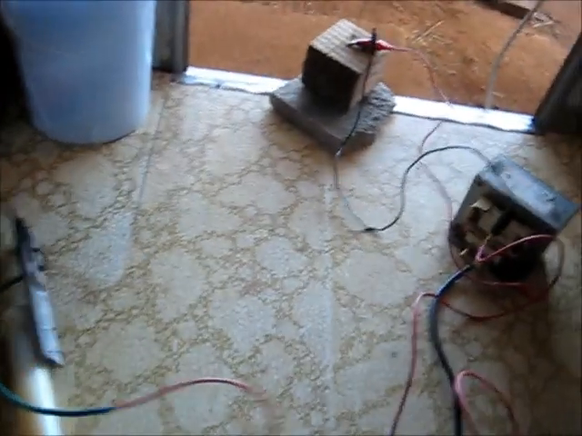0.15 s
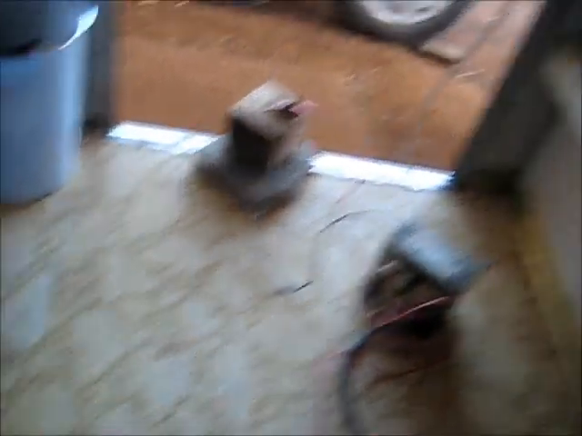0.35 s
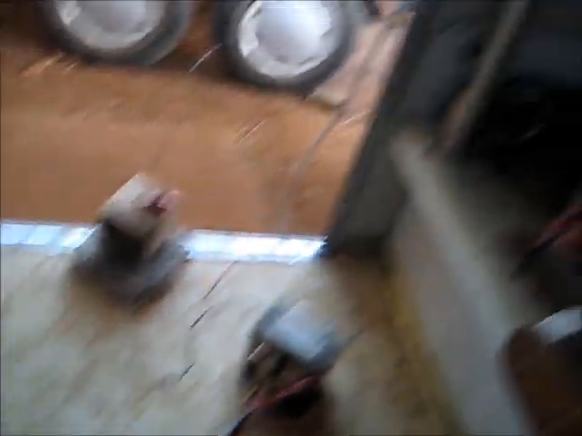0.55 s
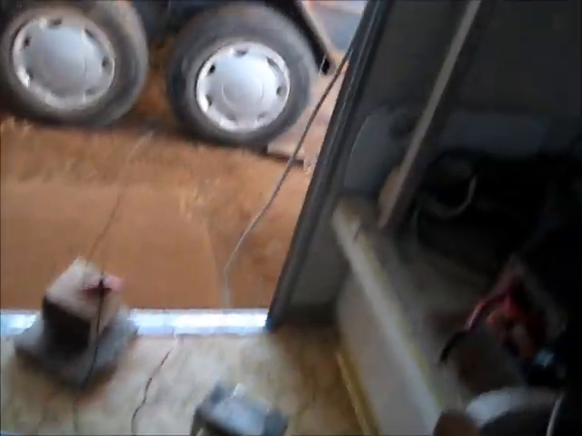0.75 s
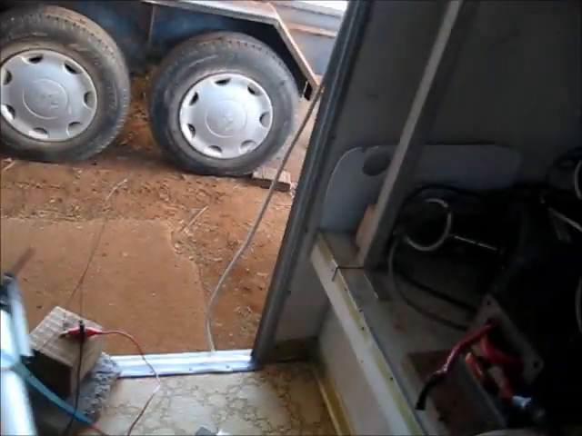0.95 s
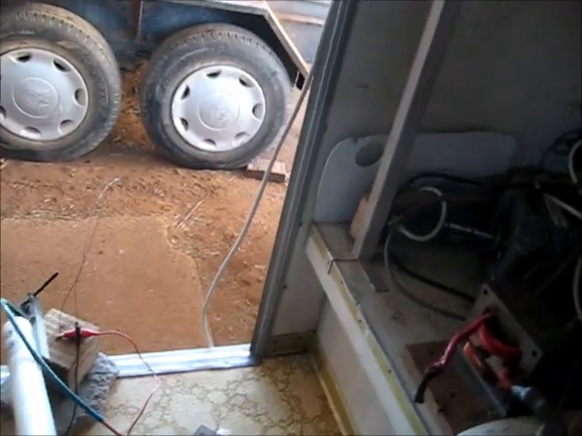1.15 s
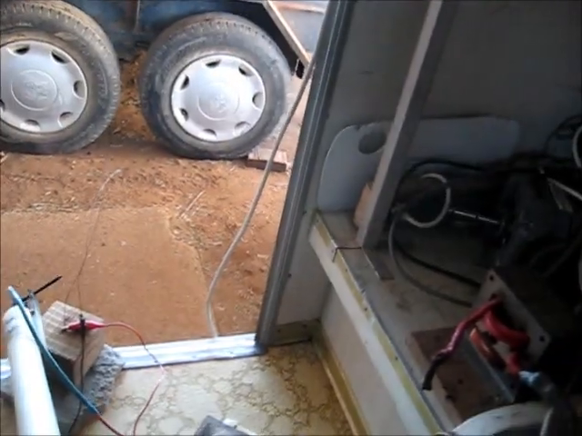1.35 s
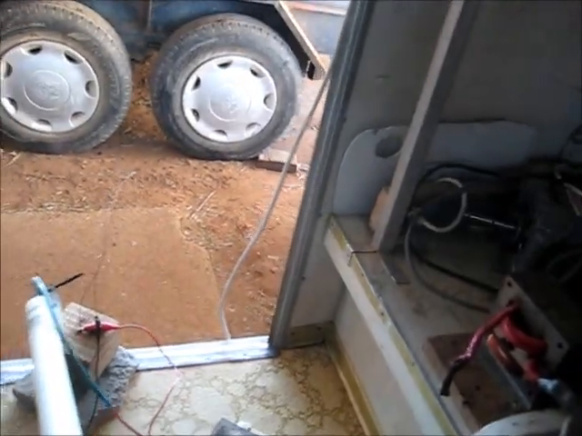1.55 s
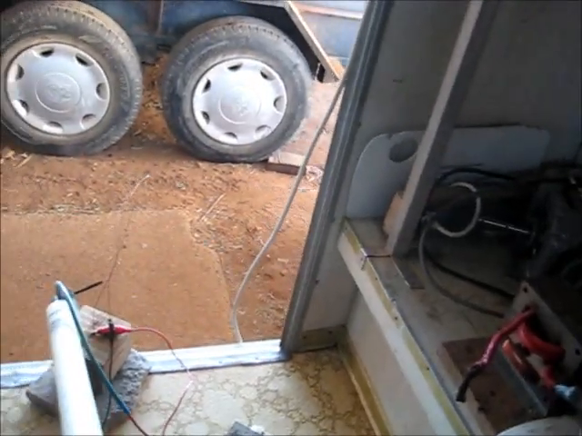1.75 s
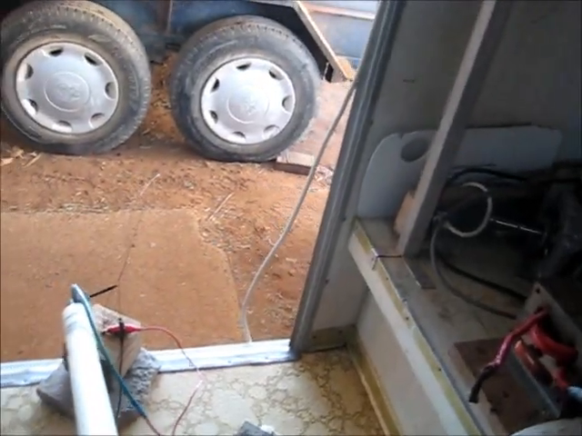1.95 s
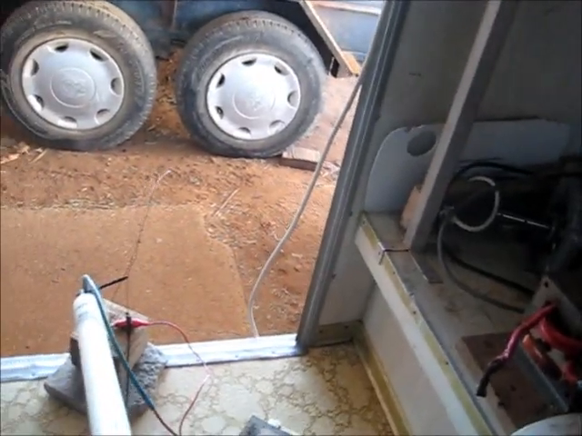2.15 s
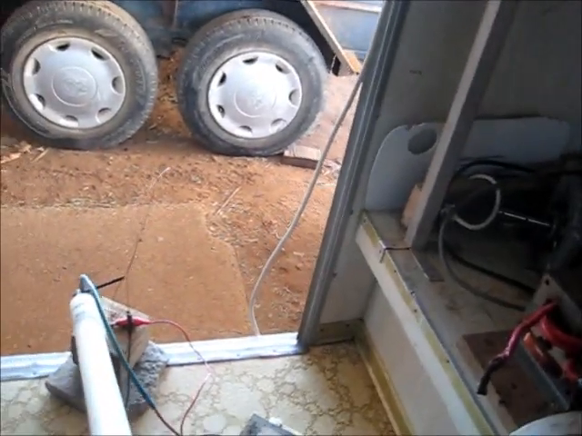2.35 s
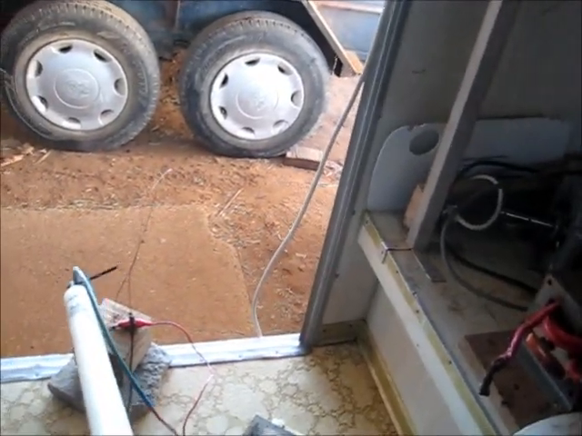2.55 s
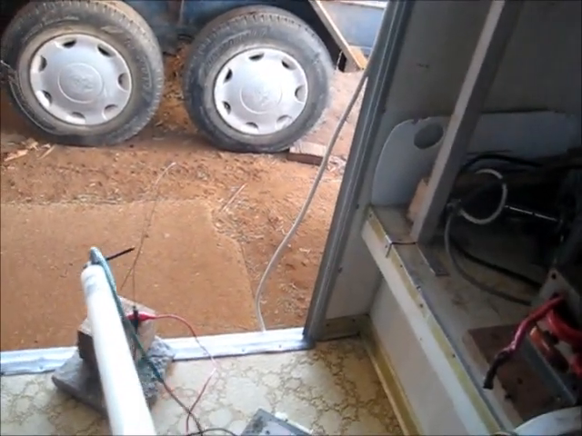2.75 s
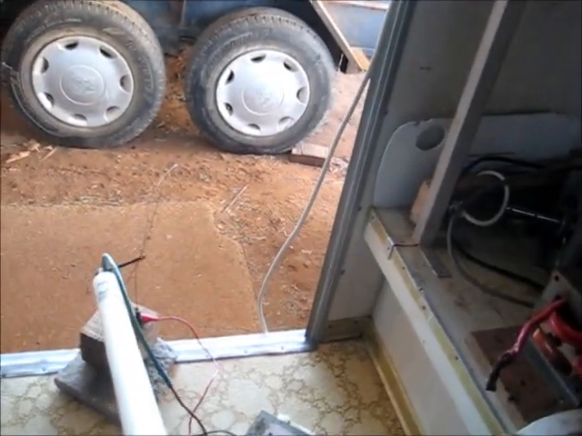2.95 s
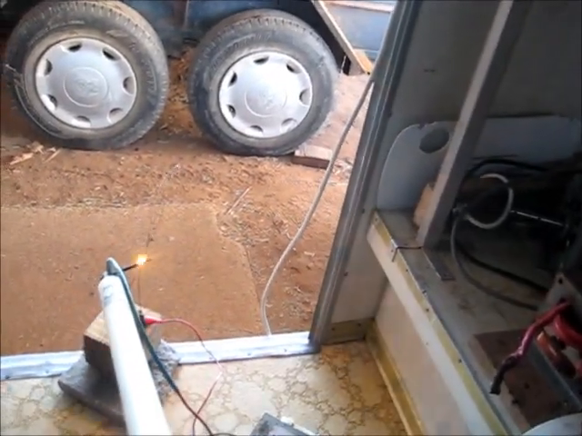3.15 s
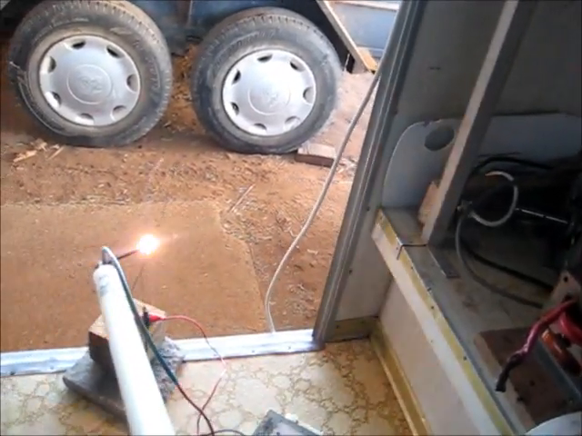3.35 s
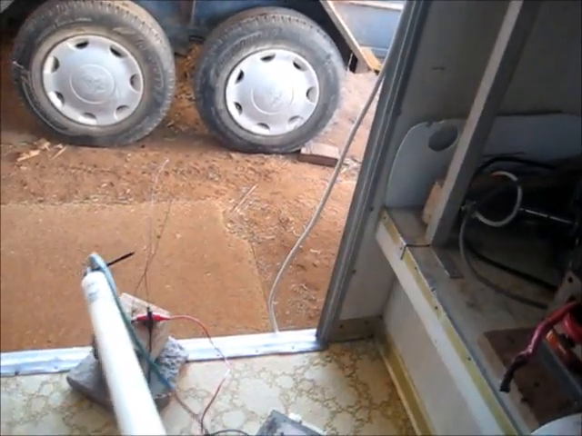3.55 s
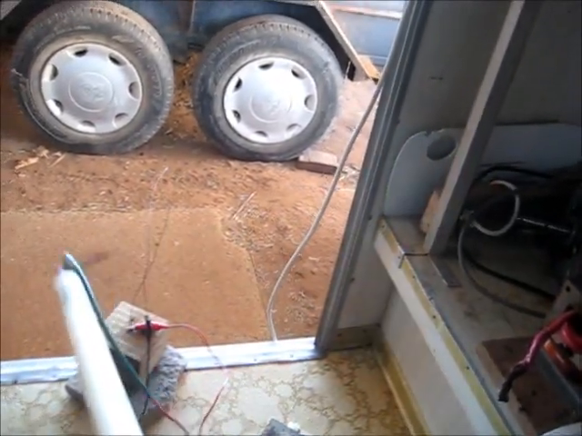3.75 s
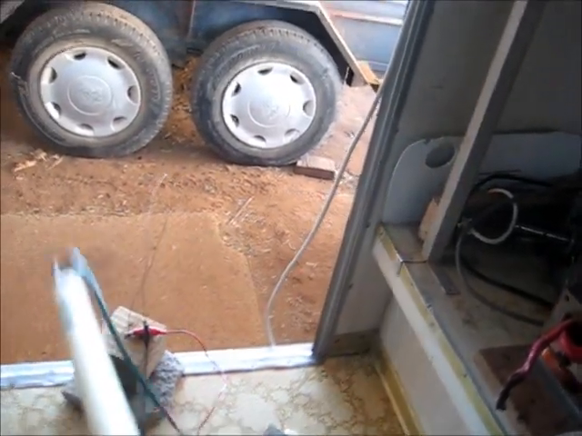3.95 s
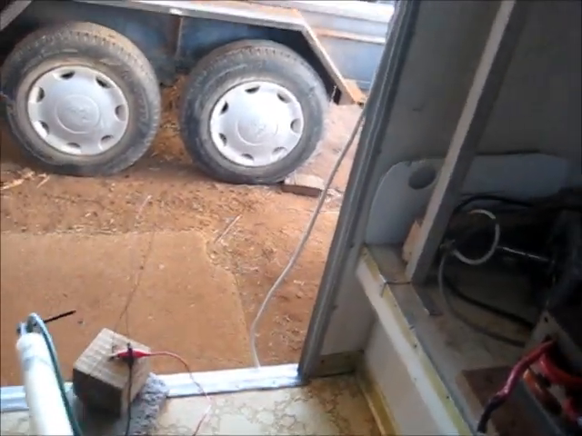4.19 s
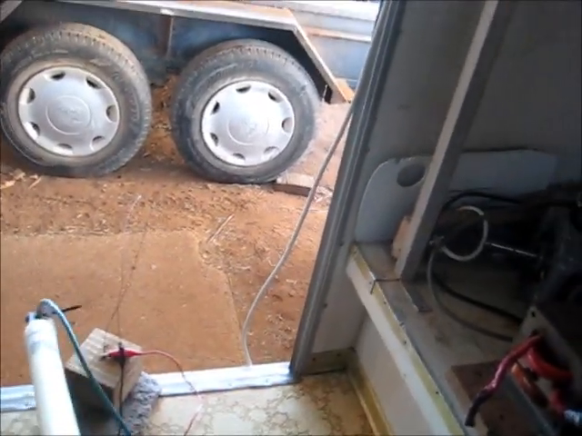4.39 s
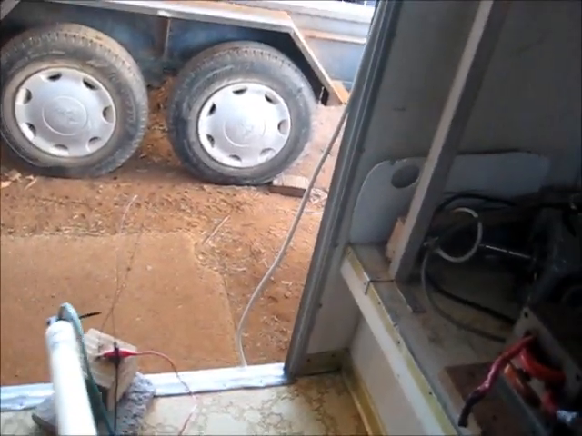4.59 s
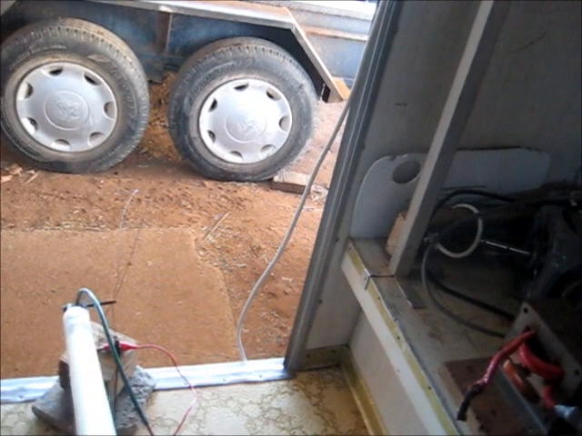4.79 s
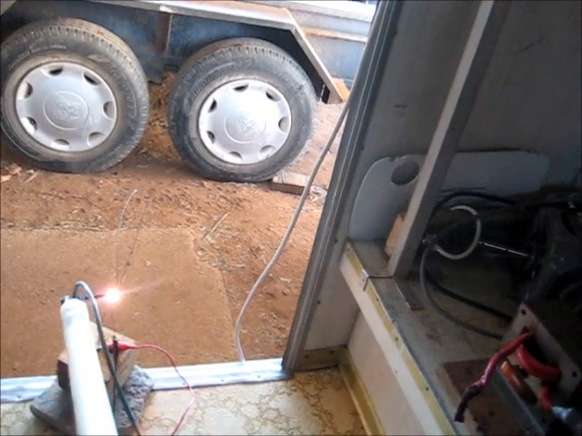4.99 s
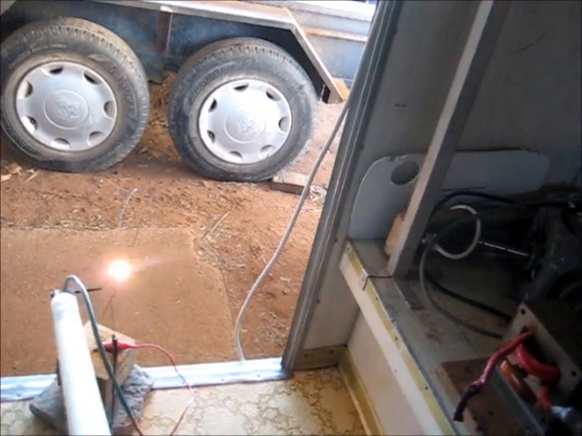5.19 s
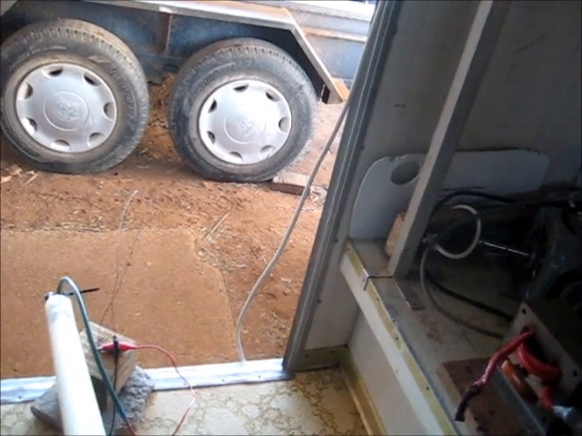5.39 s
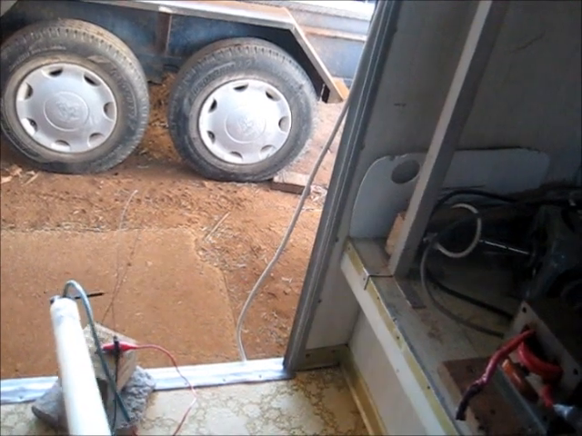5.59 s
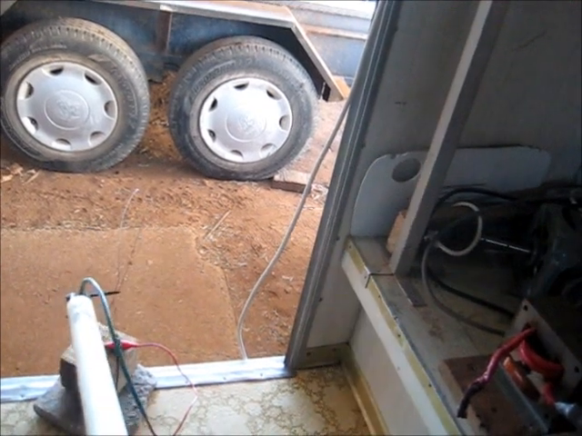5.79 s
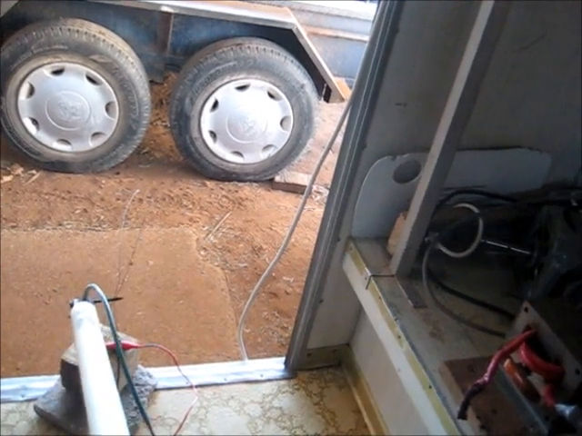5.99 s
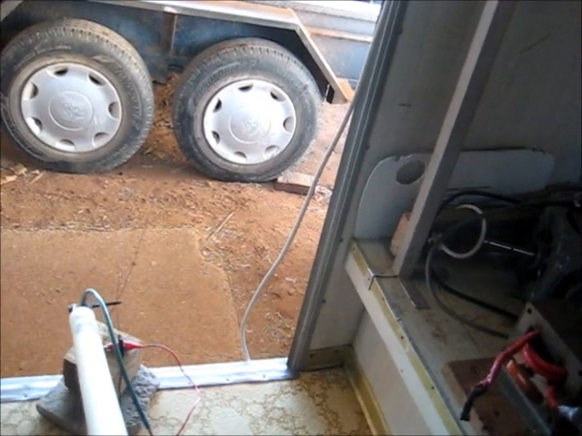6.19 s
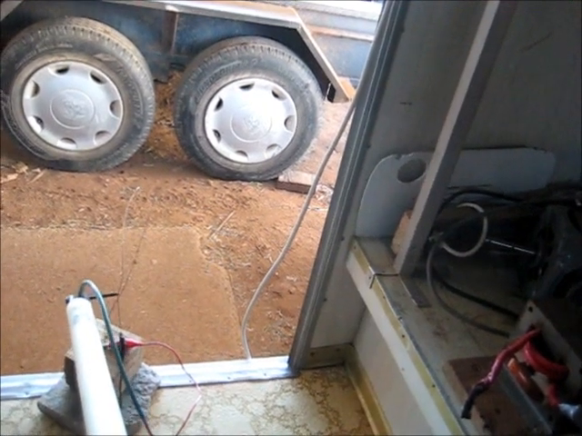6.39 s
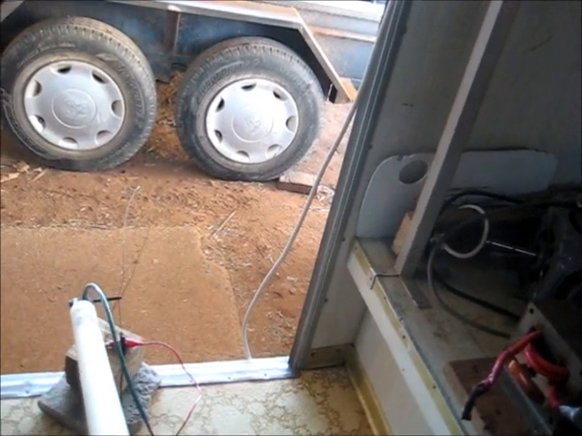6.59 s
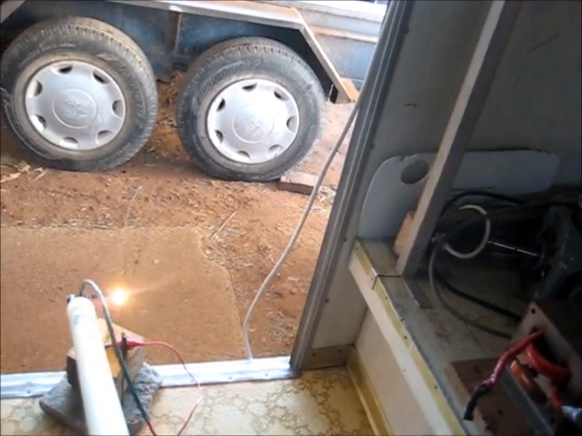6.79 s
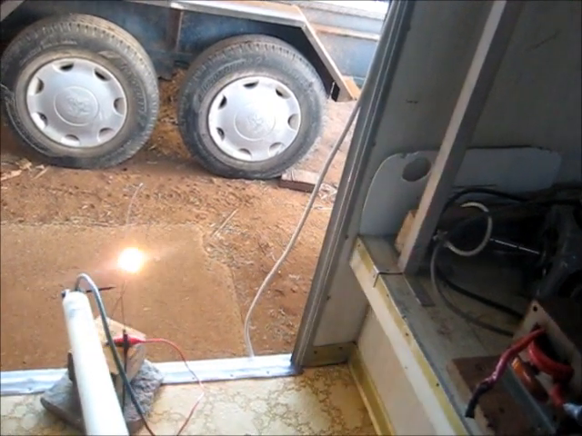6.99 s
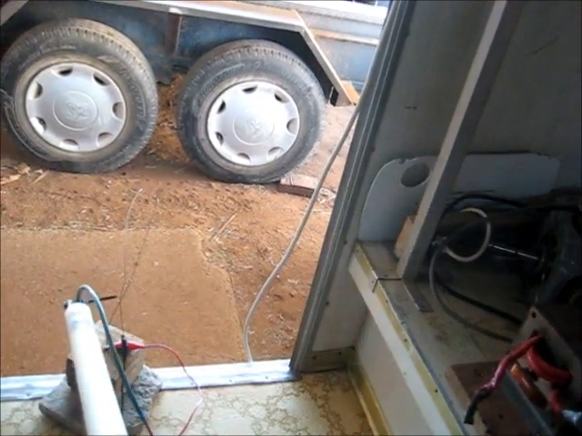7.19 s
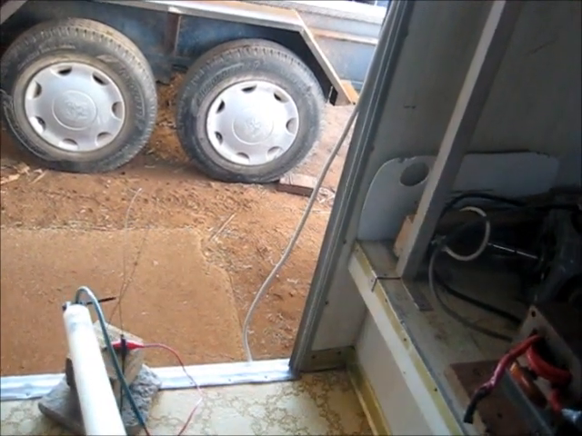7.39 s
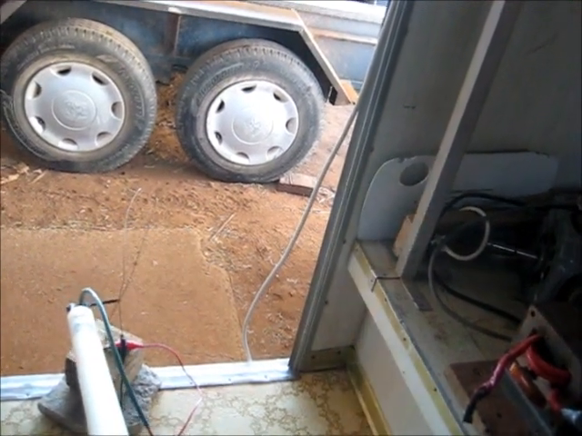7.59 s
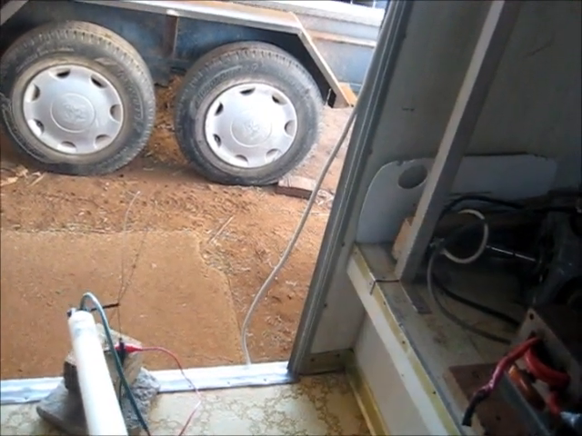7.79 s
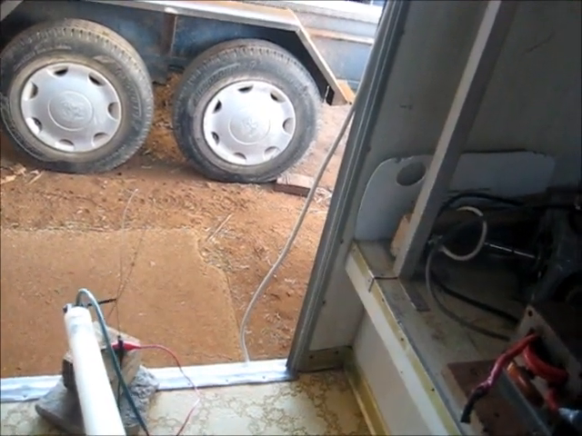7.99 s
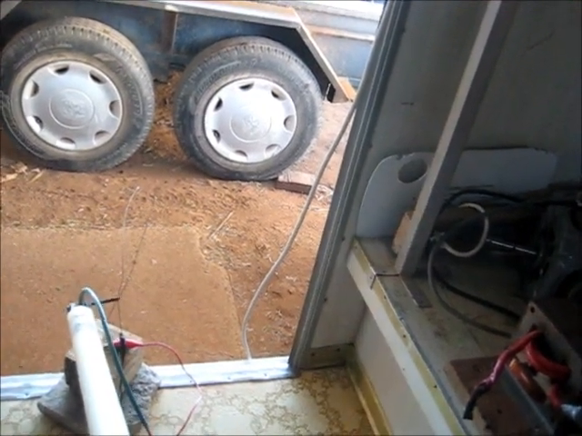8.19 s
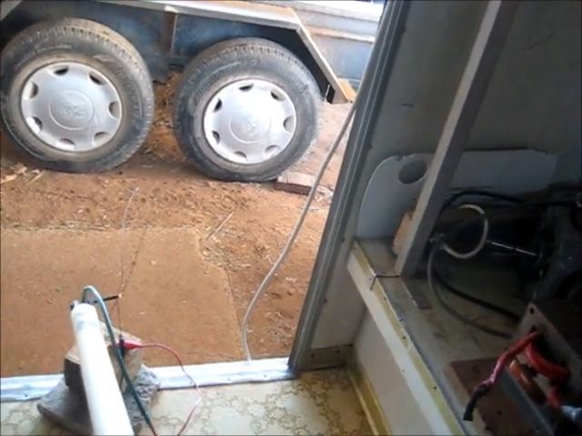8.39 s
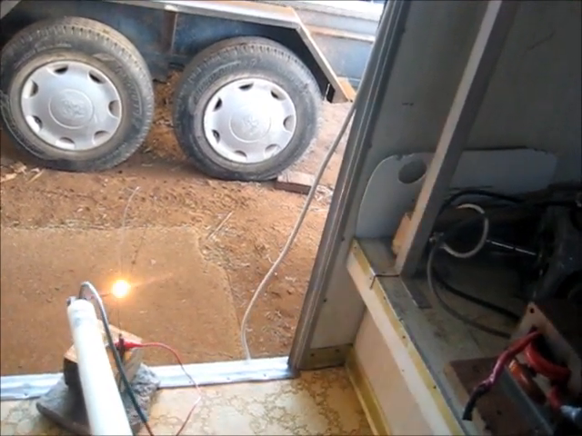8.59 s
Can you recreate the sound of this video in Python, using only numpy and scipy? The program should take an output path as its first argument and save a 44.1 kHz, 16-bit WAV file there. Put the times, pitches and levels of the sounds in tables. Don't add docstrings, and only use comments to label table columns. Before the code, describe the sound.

In a workshop doorway, cables tick and a stick knocks, then electric arcs repeatedly snap, buzz and break off above faint hum and hiss.

```python
import sys
import numpy as np
from scipy import signal
from scipy.fft import rfft, irfft, next_fast_len
from scipy.io import wavfile
from scipy.ndimage import uniform_filter1d

SR = 44100
rng = np.random.default_rng(int(sys.argv[2]) if len(sys.argv) > 2 else 0)


def wrap_up_sound(samples):
    columns = np.atleast_2d(samples).T
    tamed = np.clip(columns, -1, 1)
    steps = np.round(tamed * 32767).astype(np.int16)
    wavfile.write(sys.argv[1], SR, steps)


def convert_level_to_amplitude(level_db):
    exponent = np.asarray(level_db, float) / 20
    return 10 ** exponent


N = 381198
T = np.arange(N) / SR
HALF_CYCLE_HZ = 100.02

# t/s, current/dB, column length/0-1
ARCS = [
    [(3.14, -70, 0.2), (3.154, -33, 0), (3.244, -29, 0.41), (3.354, -30.5, 0.58), (3.396, -29, 0.75),
     (3.436, -29.5, 0.77), (3.572, -26.5, .95), (3.6, -62, 1)],
    [(4.9, -79, 0), (4.914, -34, 0.2), (5.036, -33, 0.02), (5.068, -27, 0.41), (5.152, -28, 0.52),
     (5.174, -26, 0.73), (5.202, -27.5, 0.88), (5.405, -29.5, 0.91), (5.44, -56, 1)],
    [(6.79, -43, 0.06), (6.814, -34.5, 0), (6.89, -28.5, 0.68), (7.008, -28.5, .9), (7.06, -29, 0.91),
     (7.128, -33, 0.93), (7.168, -30, 1), (7.2, -58, 1)],
    [(8.45, -58.5, 0), (8.462, -39.5, 0.2), (8.526, -27.5, 0.13), (8.596, -28, .5), (8.64, -21.5, .55)],
]
# t/s, ring/dB, fizz/dB, held/s
TOUCH = [
    (3.02, -34, -31.5, .01),
    (3.101, -43, -37.5, .004),
    (6.559, -36.5, -29, 0.12),
    (6.7, -48, -64, 0.15),
    (8.328, -41.5, -40, 0.0092),
    (8.4, -43.5, -52, 0.04),
]


def unit(x):
    return x / np.sqrt(np.mean(x ** 2))


def band(x, lo_hz, hi_hz, order=2):
    sos = signal.butter(order, [lo_hz, min(hi_hz, .45 * SR)], "band", fs=SR, output="sos")
    return signal.sosfilt(sos, x)


def colour(x, points):
    hz, db = np.transpose(points)
    size = next_fast_len(len(x))
    bin_hz = np.arange(size // 2 + 1) * SR / size
    gain = convert_level_to_amplitude(np.interp(np.log(bin_hz + 1), np.log(hz), db))
    return irfft(rfft(x, size) * gain, size)[:len(x)]


def fade(t60, seconds):
    return np.exp(-np.log(1000) * np.arange(int(seconds * SR)) / SR / t60)


def add(out, s, x):
    i = int(s * SR)
    out[i:i + len(x)] += x[:N - i]


def curves(tables):
    out = np.full((len(tables[0][0]) - 1, N), -120.)
    for table in tables:
        s, *columns = np.transpose(table)
        inside = (T >= s[0]) & (T <= s[-1])
        out[:, inside] = [np.interp(T[inside], s, c) for c in columns]
    return out


def walk(rate):
    k = int(SR / rate)
    held = np.repeat(rng.standard_normal(N // k + 1), k)
    return uniform_filter1d(uniform_filter1d(held, k), k)[:N]


def room(x, wet_db):
    # f/Hz, t60/s
    tail_bands = [
        (500, 0.26),
        (1500, 0.12),
        (4000, 0.15),
        (11000, 0.096),
    ]
    tail = 0
    for hz, t60 in tail_bands:
        noise = unit(band(rng.standard_normal(SR // 2), hz / 1.58, hz * 1.94))
        tail = tail + noise * np.sqrt(hz) * fade(t60, .5)
    tail = tail * np.minimum(np.arange(SR // 2) / SR / 0.00082, 1)
    return x + convert_level_to_amplitude(wet_db) * signal.fftconvolve(x, tail / np.sqrt(np.sum(tail ** 2)))[:N]


def engine():
    # t/s, level/dB
    idle = [(0, -65), (.3, -67), (2.4, -69), (3.55, -65), (4.4, -74), (5.4, -58.5), (6.5, -61.5),
            (7.6, -66), (8, -74), (8.64, -66)]
    level_db = np.interp(T, *np.transpose(idle)) - 5.5
    return convert_level_to_amplitude(level_db) * unit(band(rng.standard_normal(N), 101.5, 116.0))


def transformer():
    # f/Hz, level/dB
    hum_lines = [
        (299.6, -1),
        (399.3, -11.5),
        (197, -22.5),
        (590, -22.5),
        (782, -19),
    ]
    hum_db, sag_db, strain_db = -55, -8, 6.5
    sag_s = 0.073
    spans = [(a[0][0], a[-1][0]) for a in ARCS]
    spans += [(s, s + held_s + sag_s) for s, _, _, held_s in TOUCH]
    loaded = np.any([(T > a) & (T < b) for a, b in spans], axis=0)
    load = uniform_filter1d(1. * loaded, int(sag_s * SR))
    hum = 0
    for hz, db in hum_lines:
        shift_db = sag_db if db > -5 else strain_db
        level = convert_level_to_amplitude(db + 1.6 * walk(8.3) + shift_db * load)
        hum = hum + level * np.sin(2 * np.pi * (hz * T + rng.random()))
    return np.sqrt(2) * convert_level_to_amplitude(hum_db) * hum


def scrapes():
    # middle t/s, half length/s, level/dB, brightness/dB
    drags = [(0, .06, -51.5, 1), (0.215, 0.11, -51.5, 1.5), (.35, 0.97, -58, 6), (0.44, 0.066, -48, -7),
             (0.577, 0.043, -44.5, 8.5), (0.75, 0.072, -64.5, 11), (1.026, .04, -56, 2),
             (3.937, 0.058, -45.5, 3), (4.034, 0.047, -41.5, -12), (4.203, .15, -52.5, 0)]
    edge_db = -11
    dull, bright = 0, 0
    for s, half_s, db, bright_db in drags:
        swell = convert_level_to_amplitude(db + edge_db * ((T - s) / half_s) ** 2)
        dull, bright = dull + swell, bright + convert_level_to_amplitude(bright_db) * swell
    grain = rng.standard_normal(N) * convert_level_to_amplitude(2.4 * walk(200))
    body = convert_level_to_amplitude(-11) * unit(band(grain, 93, 316))
    dull = dull * (body + unit(band(grain, 470, 2300)))
    return dull + bright * unit(band(grain, 2070, 4900, order=1))


def blows(table, click):
    out = np.zeros(N)
    for s, db, hz, octaves, t60 in table:
        push = rng.standard_normal(SR // 4) * fade(max(t60, .002), .25)
        push[2] += click
        blow = band(push, hz / 2 ** (octaves / 2), hz * 2 ** (octaves / 2))
        add(out, s + 0.00101, convert_level_to_amplitude(db) * blow / np.abs(blow).max())
    return out


def knocks():
    # t/s, peak level/dB, centre f/Hz, width/octaves, t60/s
    knock_list = [(.153, -35, 120, 1.3, 0.13), (.155, -30, 255, 1.7, 0.1), (.19, -32.5, 304, 1.4, 0.15),
                  (.967, -22.5, 1400, 2.54, 0.082), (.979, -28.5, 1400, 1.8, 0.073),
                  (1.598, -27, 950, 2.3, 0.11), (3.883, -20.5, 2400, 2.4, 0.11),
                  (3.914, -24, 2370, 0.78, 0.056), (4.185, -23.5, 820, 3.44, 0.14),
                  (4.455, -19.5, 915, 3.1, 0.11)]
    return blows(knock_list, click=5.8)


def ticks():
    # t/s, peak level/dB, centre f/Hz, width/octaves, t60/s
    tick_list = [(0.0903, -33, 3780, 0.4, 0.014), (0.1406, -26, 3580, 0.36, 0.019),
                 (0.1554, -27.5, 3200, 0.45, 0.015), (0.197, -21.5, 3750, 0.77, 0.019),
                 (0.2054, -24, 4500, 0.97, 0.015), (0.3264, -32.5, 3520, 0.55, 0.014),
                 (0.4005, -27.5, 2150, 0.53, 0.018), (1.4346, -26.5, 3330, 0.98, 0.014),
                 (1.5479, -39, 2850, 0.45, 0.014), (1.5658, -45, 2650, 0.57, 0.014),
                 (1.6501, -21.5, 4040, 0.41, 0.0055), (1.7584, -29.5, 3780, 0.25, 0.01),
                 (1.9036, -34, 3880, 0.5, 0.011), (3.71, -23.5, 2930, 0.26, 0.013),
                 (4.0063, -34, 2800, 0.45, 0.013), (4.0814, -36, 3770, 0.37, 0.014),
                 (4.2193, -25.5, 2960, 0.94, 0.03), (4.5999, -27.5, 5400, 0.77, 0.014),
                 (6.137, -34.5, 2860, 0.45, 0.02), (8.078, -29, 2660, 1, 0.014)]
    # t/s, peak level/dB, centre f/Hz, width/octaves, t60/s
    crick_list = [(0.1413, -19, 7500, 2.4, 0.005), (0.4488, -7.5, 7440, 5.1, 0.0064),
                  (0.4554, -19, 7500, 2.9, 0.005), (1.4344, -27, 7500, 1.2, 0.005),
                  (3.8841, -26, 7500, 2.4, 0.005), (3.915, -16.5, 7500, 2.2, 0.0091),
                  (3.9423, -20, 7460, 0.79, 0.0058), (3.9618, -20, 7500, 1.3, 0.005),
                  (4.2188, -27, 7500, 1.7, 0.005)]
    return blows(tick_list, click=6) + blows(crick_list, click=8)


def metal():
    # t/s, peak level/dB, brightness/dB per octave
    jingles = [(2.105, -38, -4), (2.178, -28.5, -4), (2.1864, -30, -8), (2.1974, -32, -4),
               (2.2169, -27, -7.5), (2.3545, -35, 0.5), (2.407, -27, .6), (2.4174, -40, 3.5)]
    # f/Hz, level/dB, t60/s (not used here: all modes die together)
    clip_modes = [(3020, -0.5, 0.05), (4600, -9, 0.16), (6440, -3, 0.18), (8930, -4, 0.024),
                  (10950, -4, 0.088), (13160, -16, 0.036)]
    # t/s, level/dB, f/Hz, t60/s
    rods = [
        (3.922, -35, 2080, .13),
        (.56, -41, 900, .2),
        (.141, -33, 5000, .03),
        (.4, -41, 900, .08),
    ]
    out, t = np.zeros(N), T[:SR // 4]
    for s, db, tilt_db in jingles:
        ring = 0
        for hz, mode_db, _ in clip_modes:
            level_chance, pitch_chance = rng.standard_normal(2)
            level = convert_level_to_amplitude(mode_db + 2.2 * level_chance + tilt_db * np.log2(hz / 3000))
            ring = ring + level * np.sin(2 * np.pi * hz * (1 + 0.027 * pitch_chance) * t)
        rattle = 1 + 1.3 * unit(uniform_filter1d(rng.standard_normal(len(t)), size=60))
        rise = np.minimum(t / 0.0017, 1)
        add(out, s, convert_level_to_amplitude(db - 12.5) * ring * rattle * fade(0.053, .25) * rise)
    for s, db, hz, t60 in rods:
        add(out, s, convert_level_to_amplitude(db) * np.sin(2 * np.pi * hz * t) * fade(t60, .25))
    return out


def touch():
    # f/Hz, width/Hz, level/dB
    wire_modes = [
        (2100, 170, 2.5),
        (2600, 280, 2),
        (3120, 290, 5),
        (4620, 360, -6),
    ]
    ring_fall_db_s, fizz_fall_db_s, rise_s = 260, 340, 0.0018
    rung, fizzed = 0, 0
    for s, ring_db, fizz_db, held_s in TOUCH:
        rise = np.clip((T - s) / rise_s + 1, 0, 1)
        since = np.maximum(T - s, 0)
        held = rise * convert_level_to_amplitude(ring_db - ring_fall_db_s * np.maximum(since - held_s, 0))
        rung = rung + held
        fizzed = fizzed + rise * convert_level_to_amplitude(fizz_db - fizz_fall_db_s * since) + convert_level_to_amplitude(-3.5) * held
    chatter = convert_level_to_amplitude(5.4 * walk(200)) * rng.standard_normal(N)
    ring = 0
    for hz, width, db in wire_modes:
        mode = unit(band(chatter, hz - width / 2, hz + width / 2))
        ring = ring + convert_level_to_amplitude(db + 2.1 * walk(40)) * mode
    fizz = band(chatter, 3300, 9400, order=1)
    return convert_level_to_amplitude(-4.5) * rung * unit(ring) + convert_level_to_amplitude(-3.5) * fizzed * unit(fizz)


def sparks(count, late_s, jitter_s, spread_s, scatter_db, puff, hiss):
    strike_s = .0067
    cycles = int(N / SR * HALF_CYCLE_HZ) - 2
    straggle = rng.exponential(spread_s, (cycles, count)) * (np.arange(count) > 0)
    late = straggle + jitter_s * rng.standard_normal((cycles, 1))
    on_time = strike_s + late_s + np.arange(cycles)[:, None] / HALF_CYCLE_HZ
    place = ((on_time + late) * SR).astype(int)
    size = convert_level_to_amplitude(scatter_db * np.minimum(rng.exponential(1, (cycles, count)), 2))
    size = size / np.sqrt(1 + np.arange(count))
    train = np.bincount(place.ravel(), size.ravel(), N)[:N]
    air = unit(signal.fftconvolve(train, fade(0.006, .01))[:N])
    return unit(train) + (puff * air + hiss) * rng.standard_normal(N)


def grow(ends_db, grown):
    return ends_db[0] + (ends_db[1] - ends_db[0]) * grown


def column_throb(current_db, length):
    # multiple of the half cycle, level/dB
    harmonics = [(1, -18.5), (2, -9.5), (3, -6), (4, -7.5), (5, -9.5), (6, 4), (7, -2.5), (8, -9), (9, -1),
                 (10, -16), (11, -3), (12, -22), (13, -7), (14, -12)]
    deepen_db = 18
    throb = 0
    for k, db in harmonics:
        level = convert_level_to_amplitude(db + 4.8 * walk(25) + deepen_db * (length - .7) / k)
        throb = throb + level * np.sin(2 * np.pi * (k * HALF_CYCLE_HZ * T + rng.random()))
    throb_db = current_db + grow((-42, -12.5), length)
    return convert_level_to_amplitude(uniform_filter1d(throb_db, SR // 50) + 1.2) * throb


def volleys(current_db, length):
    # f/Hz, level/dB per Hz
    arc_colour = [(60, -42), (200, -12.5), (500, -13), (800, -5.5), (1200, -3), (1600, -7), (2100, -9.5),
                  (4000, -4), (8500, -8), (15800, -18.5)]
    buzz = sparks(count=3, late_s=.001, jitter_s=.00025, spread_s=.003, scatter_db=3, puff=.5, hiss=.3)
    crack = sparks(count=4, late_s=.0012, jitter_s=.0004, spread_s=.0025, scatter_db=3, puff=.7, hiss=.35)
    sizzle = sparks(count=5, late_s=.0004, jitter_s=.0007, spread_s=.002, scatter_db=8.5, puff=1.8, hiss=.84)
    crack_grown = np.minimum(length / 0.31, 1)
    layers = [(buzz, 120, 1600, grow((-21, -6), length) - 3.5),
              (crack, 1600, 4500, grow((-6.5, -1.5), crack_grown) - 6),
              (sizzle, 4500, 9500, grow((-0.5, -5.5), length) - 3.0),
              (sizzle, 9500, 17000, grow((-2.5, -11), length))]
    out = np.zeros(N)
    for x, lo_hz, hi_hz, db in layers:
        level = convert_level_to_amplitude(current_db + db + 2.3 * walk(35))
        out += level * unit(band(colour(x, arc_colour), lo_hz, hi_hz, order=3))
    return out


def shocks(length):
    # t/s, peak level/dB, centre f/Hz
    snaps = [(3.177, -21, 5970), (3.237, -8, 3900), (3.296, -6, 3760), (3.327, -8.5, 3700),
             (3.356, -12, 2680), (3.398, -5, 2100), (3.437, -7.5, 2600), (3.536, -14.5, 1100),
             (5.004, -12, 6600), (5.046, -15, 7120), (5.119, -11, 7060), (5.134, -3, 3680),
             (5.167, -3, 2000), (5.176, -6.5, 5000), (5.187, -8, 2230), (5.197, -7.5, 3710),
             (5.228, -8.5, 2400), (5.286, -14, 3000), (5.336, -9, 2640), (5.378, -10.5, 2600),
             (6.898, -5.5, 2100), (6.927, -9.5, 2050), (6.958, -13, 1250), (6.967, -7.5, 2240),
             (6.988, -12, 2130), (7.007, -8, 1130), (7.017, -6, 2020), (7.087, -19.5, 1100),
             (8.528, -7, 6000), (8.577, -6, 6000)]
    # t/s, peak level/dB, centre f/Hz
    spits = [(3.02, -11, 5610), (3.025, -9, 6200), (3.104, -30, 2120), (3.148, -15, 7100),
             (4.91, -13.5, 4900), (6.557, -11, 4600), (6.606, -12, 4700), (6.64, -23.5, 2120),
             (6.804, -12, 7100), (8.328, -15, 5600), (8.365, -31, 3000), (8.385, -25, 7870),
             (8.397, -34, 3120)]
    out = np.zeros(N)
    for s, db, hz in list(snaps) + list(spits):
        edge_db = grow((-6, -29), length[int(s * SR)]) + 12
        burst = rng.standard_normal(400) * fade(0.0043, .01)[:400]
        burst[:2] += [5, -9]
        body, edge = band(burst, hz / 1.9, hz * 1.89), band(burst, 7200, 19000)
        shock = body / np.abs(body).max() + convert_level_to_amplitude(edge_db) * edge / np.abs(edge).max()
        add(out, s + .0009, convert_level_to_amplitude(db - 3) * shock)
    return out


def doorway(x):
    # f/Hz, width/Hz, level/dB
    resonances = [(1100, 56, 7), (1400, 98, 4), (2150, 270, 8), (2640, 170, 3), (3870, 190, 0),
                  (6270, 270, 5.5), (7300, 450, 4), (8500, 270, 3.5)]
    ringing = 0
    for hz, width, db in resonances:
        ringing = ringing + (convert_level_to_amplitude(db) - 1) * band(x, hz - width / 2, hz + width / 2, order=1)
    return x + ringing


def arc():
    current_db, length = curves(ARCS)
    length = np.clip(length, 0, 1)
    sparking = doorway(volleys(current_db, length) + shocks(length))
    yard_tail = rng.standard_normal(SR // 2) * fade(0.98, .5)
    yard = signal.fftconvolve(band(sparking, 500, 2400), yard_tail)[:N] / np.sqrt(SR)
    return room(sparking, wet_db=-2.0) + convert_level_to_amplitude(-9) * yard + column_throb(current_db, length)


def scene():
    background = engine() + transformer()
    near = room(ticks() + metal(), wet_db=-16) + scrapes()
    far = room(knocks(), wet_db=-11.0) + touch() + arc()
    return np.tile(background + near + far, (2, 1))


def low_pass(x):
    return signal.sosfilt(signal.butter(12, 16500, fs=SR, output="sos"), x)


def record(dry):
    # f/Hz, level/dB per Hz
    hiss_colour = [(14, -45), (22, -19.5), (107, -17.5), (300, -13), (1180, -15), (9000, -23),
                   (13000, -27.5), (15000, -27.5)]
    # f/Hz, level/dB
    whine_lines = [
        (7575, -71.5),
        (15150, -66),
    ]
    hiss = convert_level_to_amplitude(-49) * unit(colour(rng.standard_normal(N), hiss_colour))
    hiss = hiss + convert_level_to_amplitude(-64.5) * unit(band(rng.standard_normal(N), 6030, 6600))
    whine = 0
    for hz, db in whine_lines:
        level = np.sqrt(2) * convert_level_to_amplitude(db + 2.5 * walk(90))
        whine = whine + level * np.sin(2 * np.pi * hz * T + 1.7 * walk(400))
    top_edge = signal.ellip(10, .2, 40, 15700, fs=SR, output="sos")
    return low_pass(signal.sosfilt(top_edge, dry + hiss + whine))


dry = scene()
out = record(dry)
wrap_up_sound(out)
```